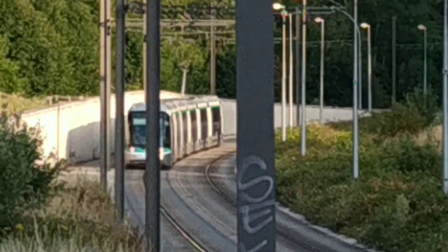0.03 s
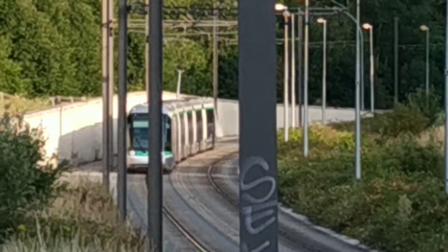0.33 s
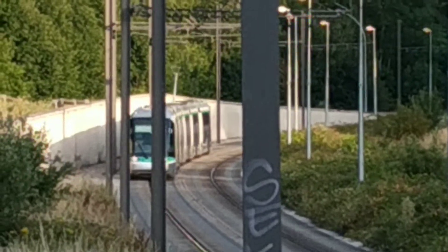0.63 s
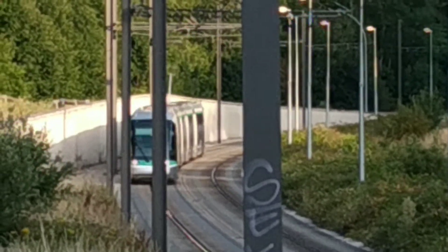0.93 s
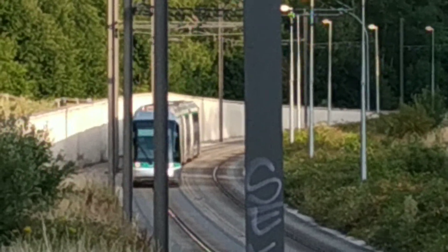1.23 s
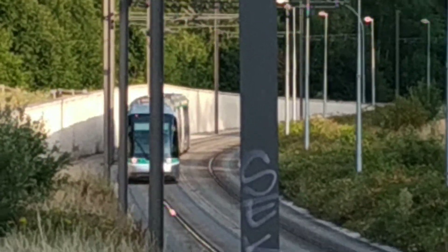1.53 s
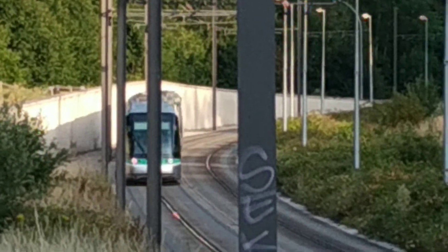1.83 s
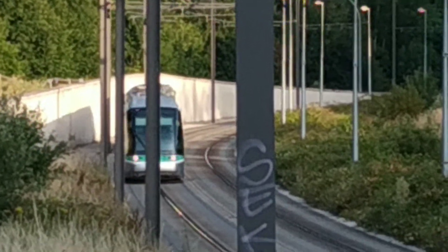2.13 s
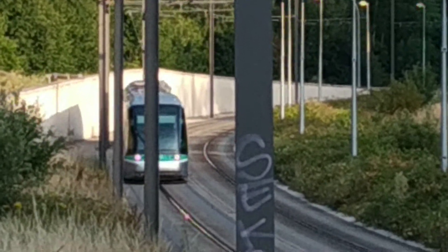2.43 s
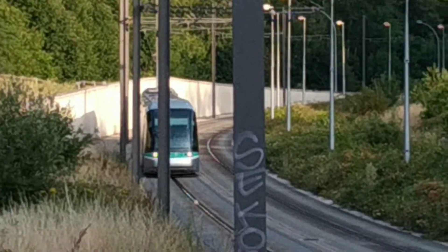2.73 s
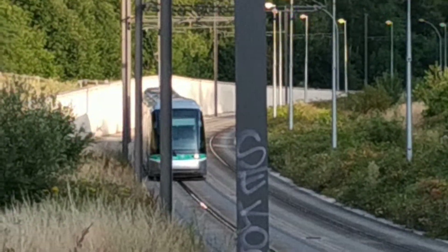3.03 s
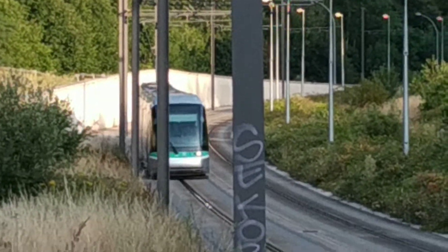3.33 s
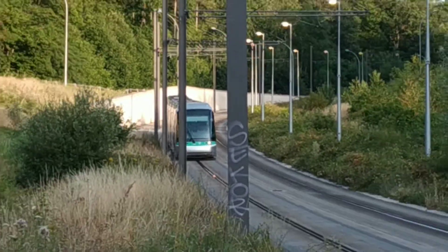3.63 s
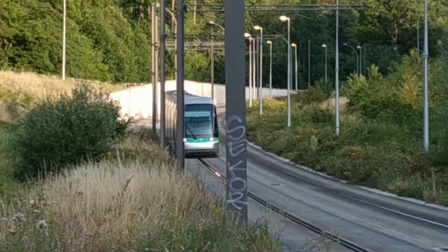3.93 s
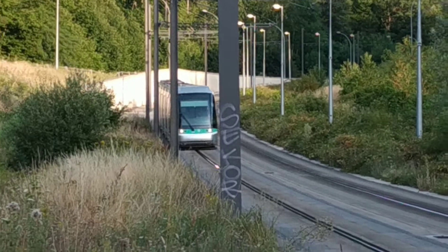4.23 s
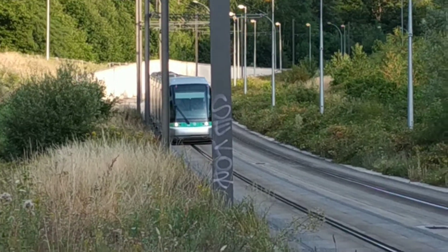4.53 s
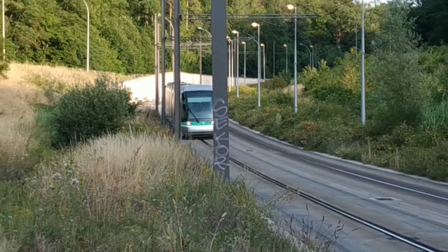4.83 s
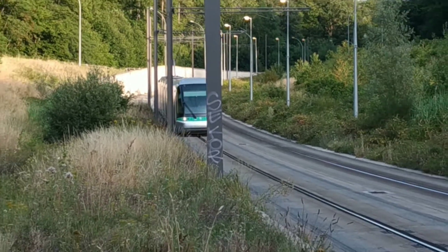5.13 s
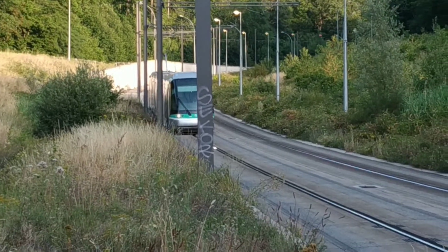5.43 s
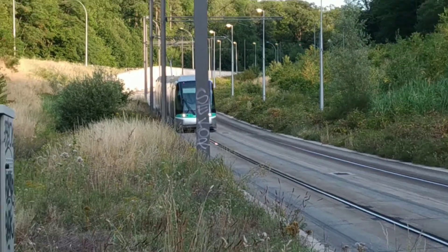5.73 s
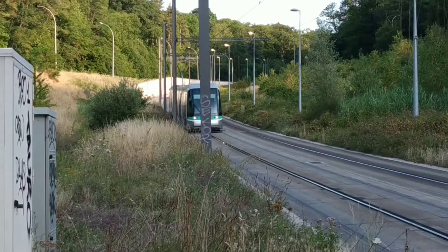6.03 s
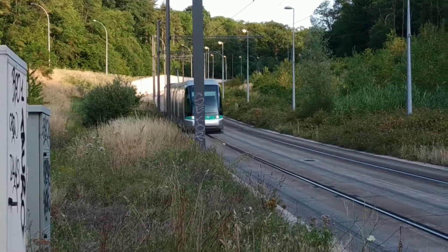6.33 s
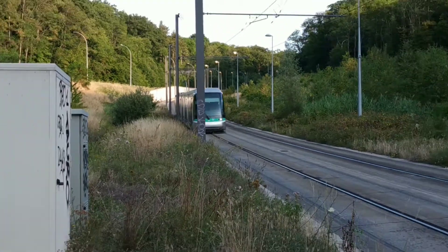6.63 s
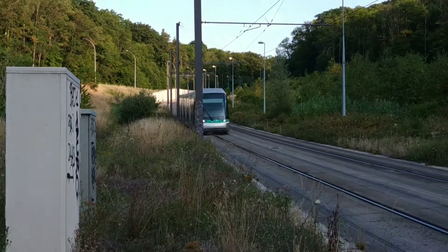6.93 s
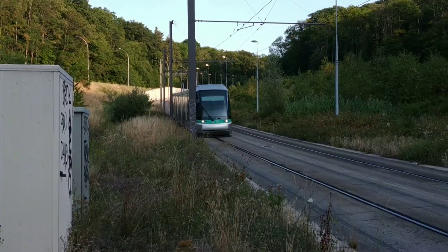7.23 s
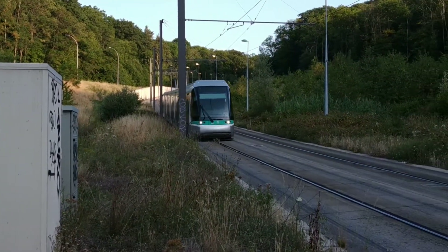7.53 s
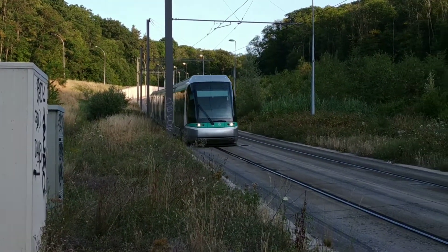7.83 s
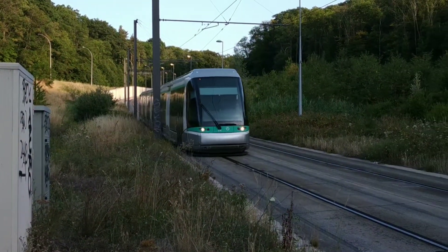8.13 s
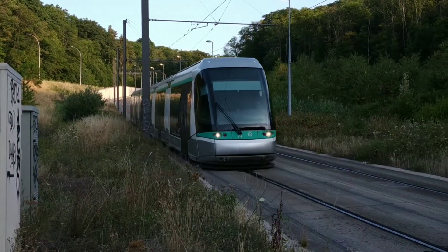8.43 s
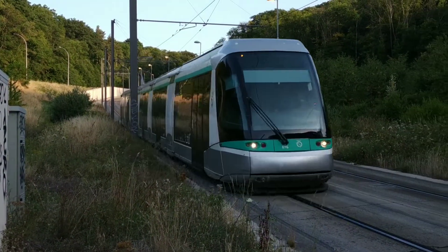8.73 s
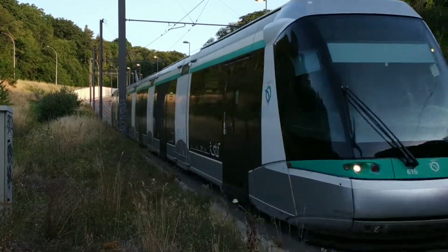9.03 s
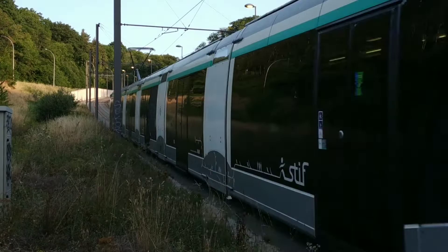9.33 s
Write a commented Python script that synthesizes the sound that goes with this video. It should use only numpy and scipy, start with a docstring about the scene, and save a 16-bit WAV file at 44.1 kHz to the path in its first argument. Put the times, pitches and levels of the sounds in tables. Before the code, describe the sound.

A rubber-tyred tram approaches from afar, rumbling and whining until it passes close, while a cricket rasps quick, high chirps.

```python
"""A rubber-tyred tram rolls out of a far curve while a bush cricket rasps double chirps in the verge,
dragging a scraper over the teeth of its wing. Tyres rumble and roar on concrete under the hum of motor
and fan. The tram gathers pace, then brakes gently; gear whine comes in spurts and the cricket pauses twice.
A second before the tram arrives the cricket falls silent. Hiss and inverter whistle open up,
and the tram's tones sag in pitch as it draws level, close by."""
import sys
import numpy as np
from scipy import signal
from scipy.fft import rfft, irfft, next_fast_len
from scipy.io import wavfile
from scipy.ndimage import uniform_filter1d, map_coordinates

SR = 44100
rng = np.random.default_rng(int(sys.argv[2]) if len(sys.argv) > 2 else 0)


def put_to_file(sound):
    """Save the sound as 16-bit audio at rate SR, in the file named by the first command-line argument."""
    columns = np.atleast_2d(sound).T  # one column per channel
    safe = np.clip(columns, -1, 1)
    whole_steps = np.round(safe * 32767)
    wavfile.write(sys.argv[1], SR, whole_steps.astype(np.int16))


N = 414540
TIME = np.arange(N) / SR
ABREAST_S, GAP_M = 9.4, 2.7  # when the tram draws level, and how far away

# The tram's pace: time_s, speed_m_per_s
TRAM_SPEED = [(0, 12), (3.4, 14), (8.3, 10), (9.4, 9.8)]
# Noise colours of body, underfloor, tyre roar, tread, hiss and fan air: pitch_hz, level_db
BODY_COLOUR = [(25, -49), (40, -40), (64, -29.5), (103, -22), (125, -15), (160, -8), (190, 0), (220, 6),
               (245, -0.5), (280, -2), (335, -16), (380, -11), (490, -30), (840, -80)]
UNDERFLOOR_COLOUR = [(25, -38), (60, -39), (110, -30), (135, -8), (165, -1), (200, 1.5), (235, -3),
                     (280, 5), (335, -5.5), (390, 3), (520, -14), (640, -9), (860, -10), (1100, -34)]
ROAR_COLOUR = [(200, -43), (320, -4.5), (430, -7), (560, -5), (680, 2), (800, 0.5), (920, -1), (1040, -9.5),
               (1400, -34), (2500, -80)]
TREAD_COLOUR = [(600, -40), (900, -4.5), (1050, -2.5), (1180, 2.5), (1400, 0), (1650, -1.5), (2000, -7.5),
                (2600, -17.5), (5000, -55)]
HISS_COLOUR = [(1200, -48), (1750, -0.5), (2100, 2.5), (2600, 1), (3000, 1.5), (3600, 2.5), (4300, -5),
               (5000, -16.5), (8000, -49)]
AIR_COLOUR = [(3000, -26), (4300, -3.5), (5000, 0.5), (5500, 1), (6150, -3), (6700, 2), (8200, 5.5),
              (9200, 7), (9900, 3), (11000, 0), (11900, 5), (12700, -5), (15500, -23)]
# Fader rides on the rolling noise, on top of its rise with nearness: time_s, level_db
BASS_RIDE = [(0, -1.5), (1.1, -0.5), (2.9, 1.5), (3.5, -1.5), (4.1, 1), (6.6, -0.5), (8, 1), (9, 1)]
MIDDLE_RIDE = [(0, 0), (1.5, 1), (2.7, 0.7), (4, -.3), (5, -0.2), (6.8, -.5), (7.6, 0.4), (8.3, -0.5),
               (9.4, 0)]
TREBLE_RIDE = [(0, -3), (1.8, 2.5), (2.6, -2.5), (3.8, -1), (4.5, -3), (5.8, -0.5), (6.75, 0), (7.1, 3.5),
               (7.7, 0.2), (8.3, 0), (8.75, 2), (9.4, 1)]
# Moving notches in the rolling noise (negative depth lifts): time_s, pitch_hz, depth_db
GROUND_NOTCH = [(0, 1370, 6), (1, 1570, 8.5), (3, 1720, 5), (4.5, 1910, 8), (6.3, 2930, 3.5),
                (8.5, 3350, 1.5), (8.95, 3220, 8), (9.4, 2080, -5)]  # the ground bounce cancels one band
MID_HISS_NOTCH = [(7.8, 6300, -1), (8.45, 6300, 4), (8.85, 5600, 5), (9.4, 5200, 7)]
TOP_HISS_NOTCH = [(8.2, 10200, -2), (8.8, 10600, -1), (9.15, 11000, 6), (9.4, 10100, 18)]
# How alike the tram sounds in both ears: pitch_hz, likeness_ratio
TRAM_LIKENESS = [(60, 0.53), (130, 1), (300, 0.92), (640, 0.91), (1400, 1), (2500, 0.73), (4000, 0.13),
                 (15000, 0.13)]
# The tram's stereo balance: pitch_hz, left_minus_right_db
TRAM_PAN = [(60, -1), (200, -2.5), (700, -2), (1300, -1.5), (1600, -4.5), (2400, -1.5), (3300, 1.5),
            (4200, 10), (5200, 14), (7000, 7.5), (10500, 2.5), (12000, 11), (14000, 28)]
# Swells of motor hum, roof fan and gear mesh: time_s, level_db
MOTOR_RIDE = [(0.0, -47), (0.17, -42.5), (0.51, -40), (1.33, -56), (2.81, -55), (2.97, -40.5), (3.2, -53),
              (3.28, -40), (4.03, -44), (4.7, -55), (4.95, -42), (5.9, -37.5), (6.23, -45.5), (7.0, -43),
              (7.2, -50), (8.27, -27), (8.67, -30), (8.9, -23.5), (9.09, -19), (9.3, -21.5), (9.4, -31)]
FAN_RIDE = [(0.0, -49.5), (3.48, -52.5), (4.75, -49), (5.2, -45.5), (5.7, -43.5), (6.05, -39), (6.4, -42.5),
            (6.72, -41), (7.1, -47), (7.6, -38), (8.04, -39.5), (8.3, -44), (8.6, -40), (9.0, -44)]
MESH_RIDE = [(0, -61), (5.1, -59), (5.55, -53), (5.72, -48.5), (6.35, -47.5), (6.6, -41.5), (6.8, -42),
             (7.0, -43.5), (7.2, -39), (7.45, -41), (7.9, -45), (8.25, -40.5), (9.4, -44)]
# Machine tones as heard head-on at 9.8 m/s: pitch_hz, level_db
FAN_TONES = [(501.3, 1.5), (454.4, -6), (218.6, -11.5), (166, -8)]
GEAR_TONES = [(1156, -5), (2048, -10.5), (2880, -7.5), (3099, -11), (3316, -10), (3489, -12), (3596, -18)]
COIL_TONES = [(4492, -0.5), (4637, -12), (4938, -6.5), (5657, -10), (5835, -9.5), (7640, -7.5)]
INVERTER_TONES = [(3610, -5), (4490, -5.5), (5822, -12), (6700, -10.5), (7171, -10), (7610, -2),
                  (8075, -11), (8500, 1)]

# Runs of evenly spaced chirps: first_s, last_s, level_db
CHIRP_RUNS = [(.0068, 2.5448, -3), (2.627, 3.0275, -2.5), (3.1051, 5.6295, -3.5), (5.708, 6.348, -3.5),
              (6.664, 7.453, -4), (7.964, 8.36, -6.5)]
# The chirps drag and hurry: time_s, late_ms
CHIRP_DRAG = [(0, -1), (.8, 2), (2.0, -2), (2.8, 0.5), (3.1, -2.5), (3.42, 0), (3.97, -1), (4.2, 1.5),
              (4.9, 3), (5.25, -2.5), (6.35, 0.5)]
# A chirp's two wing strokes: peak_s, bite_before_peak_s, swell_s, fade_s, tooth_rate_hz, level_db
WING_STROKES = [(-.0012, .0088, 0.0049, 0.0015, 800, -5.5), (0.0211, .0125, 0.008, 0.0066, 800, -8.5)]
# The scraper jumps coarse teeth at the height of the second stroke: into_chirp_s, level_db
COARSE_TEETH = [(0.021, -6.5), (0.0224, -4.5), (.0251, -2.5), (.0283, -5), (.0325, -12)]
# Colours of the cricket's song: pitch_hz, level_db
WING_COLOUR = [(6500, -43.5), (7800, -34), (8450, -18), (8900, -8), (9400, -2.5), (9850, -4), (10250, 0),
               (10700, -1.5), (11250, -6), (11620, -12.5), (12000, -8.5), (12600, -13.5), (13100, -21),
               (14100, -20), (15000, -24.5), (15600, -29)]  # the ringing membrane
COARSE_COLOUR = [(9500, -0.5), (11000, 1), (12200, -6), (13500, -12)]  # coarse teeth sound duller than fine ones
SIZZLE_COLOUR = [(8000, 2.5), (11500, -1), (12500, 2), (13500, 5.5), (15500, 5)]  # a bright, high sizzle lingers between the chirps
# Stereo balance of the close song and of its echo from the verge: pitch_hz, left_minus_right_db
WING_PAN = [(8400, 10), (9300, 5.5), (10200, 4), (10800, 1), (12200, -2.5), (15000, -1)]
VERGE_PAN = [(8400, 10), (10200, 6.5), (11200, 3.5), (12500, 0.5)]


def rolling():
    """The body booms, tyres roar on concrete; hiss and fan air open up, and the front wheel sweeps by."""
    body = nearing(-24, lead_m=2.3, reach_m=2.8, fall_db=4, far_db=-44.5) * rush(BODY_COLOUR, -1)
    underfloor = nearing(-20.5, lead_m=.2, reach_m=2.25, fall_db=6) * rush(UNDERFLOOR_COLOUR, .5)
    roar = nearing(-21, lead_m=3, reach_m=7.6, fall_db=6.5, far_db=-43) * rush(ROAR_COLOUR, 1.5)
    tread = nearing(-22, lead_m=5.8, reach_m=4.63, fall_db=4.5, far_db=-41) * rush(TREAD_COLOUR, 1.5)
    hiss = nearing(-29, lead_m=5.6, reach_m=17.1, fall_db=12, far_db=-49) * rush(HISS_COLOUR, 1.5)
    front_wheel = nearing(-26, lead_m=.1, reach_m=1.45, fall_db=14.5) * rush(HISS_COLOUR, 4.5)
    air = nearing(-29.5, lead_m=3.4, reach_m=9.4, fall_db=8, far_db=-65) * rush(AIR_COLOUR, 3)
    bass = ride(BASS_RIDE) * body
    middle = ride(MIDDLE_RIDE) * (roar + tread)
    treble = ride(TREBLE_RIDE) * (hiss + air)
    return bass + underfloor + middle + treble + front_wheel


def rush(colour, patchy_db):
    """Coloured stereo noise from the tram, with drifting patches and three moving notches."""
    hz, t, (mid, side) = signal.stft(rng.standard_normal((2, N)), SR, nperseg=1024)
    hz = hz[:, None]
    patches = uniform_filter1d(rng.standard_normal(mid.shape), 7, axis=0)
    patches = unit(uniform_filter1d(patches, 12, axis=1))
    cut_db = 0
    for notch, width in (GROUND_NOTCH, .19), (MID_HISS_NOTCH, .066), (TOP_HISS_NOTCH, .065):
        notch_hz, depth_db = curves(notch, t)
        cut_db += depth_db * np.exp(-(np.log((hz + 1) / notch_hz) / width) ** 2)
    alike = np.clip(along(TRAM_LIKENESS, hz), 0, .999)
    side = side * np.sqrt((1 - alike) / (1 + alike))
    lag_ms, pan_db = bearing(t)
    lead = amp(pan_db / 2) * np.exp(1j * np.pi * hz * lag_ms / 1000)
    pair = np.array([(mid + side) * lead, (mid - side) / lead]) * ears(TRAM_PAN, hz)
    noise = signal.istft(pair * amp(patchy_db * patches - cut_db), nperseg=1024)[1][:, :N]
    noise = filtered(noise, lambda hz: amp(along(colour, hz)))
    return noise / np.std(noise.mean(0))


def motor_and_fan():
    """The motor and the roof fan hum, swelling and fading along the way."""
    motor = ride(MOTOR_RIDE) * tones([(402.3, .4)], scatter=.21, flutter_hz=16, behind_m=-.93)
    fan = ride(FAN_RIDE) * tones(FAN_TONES, scatter=.33, flutter_hz=7.6)
    return motor + fan


def gears(surges_per_m=.8, surge_db=2, mesh_flicker_db=.7, whine_flicker_db=1.5):
    """The gears whine, and one mesh tone surges in step with the distance rolled."""
    whine = nearing(-40, lead_m=7.8, reach_m=12, fall_db=6, far_db=-50.5)
    whine = whine * tones(GEAR_TONES, scatter=.9, flutter_hz=19)
    surge = np.sin(2 * np.pi * surges_per_m * travel()[1])
    mesh_gain = ride(MESH_RIDE) * amp(surge_db * surge + mesh_flicker_db * wobble(18))
    mesh = mesh_gain * tones([(2648, 0)], scatter=.6, flutter_hz=60)
    return whine * amp(whine_flicker_db * wobble(4.4)) + mesh


def electrics():
    """Coils sing, and the inverter adds whining sidebands and a thin whistle."""
    coils = nearing(-46.5, lead_m=18, reach_m=13.6, fall_db=16, far_db=-66.5)
    coils = coils * tones(COIL_TONES, scatter=1.6, flutter_hz=50)
    sidebands = nearing(-33.5, lead_m=3.7, reach_m=6.5, fall_db=12, far_db=-71)
    sidebands = sidebands * tones(INVERTER_TONES, scatter=2.1, flutter_hz=80, behind_m=.3)
    whistle = nearing(-33, lead_m=2.8, reach_m=10.6, fall_db=14.5)
    whistle = whistle * tones([(12000, 0)], scatter=.9, flutter_hz=80, behind_m=.3)
    return coils + sidebands + whistle


def tones(lines, scatter, flutter_hz, behind_m=0):
    """Doppler-shifted tones of a machine behind_m back from the nose; scattered paths make them flutter."""
    warped_s = np.cumsum(doppler(behind_m)) / SR
    out = np.zeros((2, N))
    for hz, db in lines:
        shared, apart = (wobble(flutter_hz) + 1j * wobble(flutter_hz) for _ in range(2))
        spread = np.sqrt(np.clip(1 - along(TRAM_LIKENESS, hz), 0, 1))
        paths = 1 + scatter * (shared + spread * np.array([apart, -apart]))
        tone = np.real(paths * np.exp(2j * np.pi * hz * warped_s))
        out += amp(db) * ears(TRAM_PAN, hz)[:, None] * tone / np.std(tone.mean(0))
    return out


def travel(t=TIME):
    """The tram's speed (m/s) and the track still to go (m) until it draws level."""
    speed = curves(TRAM_SPEED)[0]
    gone = np.cumsum(speed) / SR
    return np.interp(t, TIME, speed), np.interp(ABREAST_S, TIME, gone) - np.interp(t, TIME, gone)


def nearing(peak_db, lead_m, reach_m, fall_db, far_db=None):
    """Gain that peaks lead_m before the tram draws level, fall_db less per doubling beyond reach_m."""
    doublings = np.log2(np.hypot(1, (travel()[1] - lead_m) / reach_m))
    waver_db = .5 * wobble(6)  # moving air
    direct = amp(peak_db - fall_db * doublings + waver_db)
    return direct if far_db is None else np.hypot(direct, amp(far_db))  # over a steady far wash


def doppler(behind_m, sound_m_per_s=343, listed_m_per_s=9.8):
    """Pitch ratio from the part of the speed that points at the listener."""
    speed, to_go = travel()
    away = to_go + behind_m
    closing_speed = speed * away / np.hypot(away, GAP_M)
    return (sound_m_per_s - listed_m_per_s) / (sound_m_per_s - closing_speed)


def bearing(t, ahead_lag_ms=.048, abreast_lag_ms=.24, ahead_pan_db=2.5):
    """Right-ear lag (ms) and leftward pan (dB) as the tram swings from ahead to alongside."""
    swing = GAP_M ** 2 / (GAP_M ** 2 + travel(t)[1] ** 2)
    return ahead_lag_ms + (abreast_lag_ms - ahead_lag_ms) * swing, ahead_pan_db * (1 - swing)


def cricket(stop_db=-7, stems_db=-10, verge_db=-7, split_hz=9570, left_lag_s=.00056):
    """Tooth strikes ring the wing's low and high modes; stems and the verge scatter the song."""
    chirps = chirp_times()
    ring = irfft(causal(amp(along(WING_COLOUR, np.fft.rfftfreq(1024, 1 / SR)))))
    high = lambda hz: .5 + .5 * np.tanh((hz - split_hz) / 600)
    strikes = fine_teeth(chirps) + coarse_teeth(chirps)
    strikes = filtered(strikes, lambda hz: np.array([1 - high(hz), high(hz)])).sum(0)
    rasp = signal.fftconvolve(strikes, ring)[:N]
    song = unit(rasp) + amp(stop_db) * unit(wing_stop(chirps))
    direct = filtered(song, lambda hz: np.exp(-2j * np.pi * np.outer([left_lag_s, 0], hz)))
    stems = amp(stems_db) * scattered(song, t60_s=.035)
    close = filtered(direct + stems, lambda hz: ears(WING_PAN, hz))
    verge = scattered(song, t60_s=.23)
    sizzle = filtered(verge, lambda hz: amp(along(SIZZLE_COLOUR, hz)) * ears(VERGE_PAN, hz))
    return amp(-30) * unit(close + amp(verge_db) * sizzle)


def chirp_times(period_s=.0793):
    """The cricket's loose beat, one row a chirp: time_s, level_db."""
    rows = []
    for first, last, db in CHIRP_RUNS:
        count = round((last - first) / period_s) + 1
        rows += [(s, db) for s in np.linspace(first, last, count)]
    s, db = np.transpose(rows)
    return np.column_stack([s + curves(CHIRP_DRAG, s)[0] / 1000, db])


def fine_teeth(chirps, count=25):
    """Each stroke bites at once and drags the scraper over uneven teeth, swelling and breaking off."""
    strikes = np.zeros((2, N))
    for peak_s, bite_s, swell_s, fade_s, rate_hz, stroke_db in WING_STROKES:
        teeth = np.arange(count) + rng.normal(0, .3, (len(chirps), count))
        pace, force = rng.standard_normal((2, len(chirps), 1))  # no two strokes are alike
        from_peak_s = teeth / rate_hz - bite_s
        envelope = np.exp(-.5 * (from_peak_s / np.where(from_peak_s < 0, swell_s, fade_s)) ** 2)
        tooth_db = chirps[:, 1:] + stroke_db + .71 * force + 1.3 * rng.standard_normal(teeth.shape)
        tooth_s = chirps[:, :1] + peak_s + from_peak_s * np.exp(.12 * pace)
        strikes += strike(tooth_s, envelope * amp(tooth_db))
    return strikes


def coarse_teeth(chirps, slip_s=.0007, jitter_s=.0002, scatter_db=1.8):
    """The coarse teeth give a few separate hard clicks, never quite in the same place."""
    s, db = np.transpose(COARSE_TEETH)
    jitter, force = rng.standard_normal((2, len(chirps), len(s)))
    slip = rng.standard_normal((len(chirps), 1))
    click_s = chirps[:, :1] + s + slip_s * slip + jitter_s * jitter
    clicks = strike(click_s, amp(chirps[:, 1:] + db + scatter_db * force))
    return filtered(clicks, lambda hz: amp(along(COARSE_COLOUR, hz)))


def strike(s, size, lean_db=2.5):
    """Clicks shared unevenly between the wing's low and high modes."""
    lean = lean_db * rng.standard_normal(s.shape)
    return np.array([impulses(s, size * amp(-lean)), impulses(s, size * amp(lean))])


def wing_stop(chirps, start_hz=10400, end_hz=8700, early_s=.0006, length_s=.0035):
    """As the first stroke brakes, the teeth merge into a short falling tone."""
    progress = np.linspace(0, 1, int(length_s * SR))
    pitch, force = rng.standard_normal((2, len(chirps), 1))
    hz = (start_hz + (end_hz - start_hz) * progress) * (1 + .018 * pitch)
    envelope = amp(chirps[:, 1:] + 1.1 * force) * np.sin(np.pi * np.sqrt(progress))
    squeak = envelope * np.sin(2 * np.pi * np.cumsum(hz, axis=1) / SR)
    samples = np.round((chirps[:, :1] - early_s) * SR) + np.arange(len(progress))
    return impulses(samples / SR, squeak)


def scattered(x, t60_s):
    """A diffuse stereo tail of about the same energy as x."""
    t = TIME[:SR // 4]
    tail = rng.standard_normal((2, len(t))) * amp(-60 * t / t60_s)
    return signal.fftconvolve(x[None], tail / np.linalg.norm(tail[0]), axes=1)[:, :N]


def amp(db):
    """Decibels to gain."""
    return 10 ** (np.asarray(db) / 20)


def unit(x):
    """Scale to rms 1."""
    return x / np.sqrt(np.mean(x ** 2) + 1e-20)


def along(points, hz):
    """Read (pitch_hz, value) points on a log axis."""
    pitches, values = np.transpose(points)
    return np.interp(np.log(hz + 1), np.log(pitches + 1), values)


def curves(rows, t=TIME):
    """Each column after the time, read at the times t."""
    s, *columns = np.transpose(rows)
    return [np.interp(t, s, column) for column in columns]


def ride(rows):
    """A fader move: gain from (time_s, level_db) points."""
    return amp(curves(rows)[0])


def wobble(rate_hz):
    """A smooth random curve with rate_hz knots a second."""
    coarse = TIME[::32]
    knots = rng.standard_normal(int(N * rate_hz / SR) + 4)
    return np.interp(TIME, coarse, map_coordinates(knots, [coarse * rate_hz]))


def filtered(x, response):
    """Multiply the spectrum of x by a function of frequency."""
    size = next_fast_len(N + SR // 2)
    return irfft(rfft(x, size) * response(np.fft.rfftfreq(size, 1 / SR)), size)[..., :N]


def causal(gain):
    """The minimum-phase response with this gain: it rings only after the blow."""
    cepstrum = irfft(np.log(np.maximum(gain, 1e-6)))
    half = len(cepstrum) // 2
    cepstrum[1:half] *= 2
    cepstrum[half + 1:] = 0
    return np.exp(rfft(cepstrum))


def ears(pan, hz):
    """Left and right gains whose mean is 1."""
    gains = amp(np.multiply.outer([.5, -.5], along(pan, hz)))
    return gains / gains.mean(0)


def impulses(s, size):
    """Clicks of the given sizes at the given times."""
    at = np.round(s * SR).astype(int)
    heard = (at >= 0) & (at < N)
    return np.bincount(at[heard], size[heard], N)


def scene():
    """Tram and cricket together."""
    return rolling() + motor_and_fan() + gears() + electrics() + cricket()


def record(dry, self_noise_db=-60, top_hz=15550):
    """The microphones add a faint hiss of their own; everything above top_hz is cut."""
    return filtered(dry + amp(self_noise_db) * rng.standard_normal(dry.shape), lambda hz: hz < top_hz)


dry = scene()
out = record(dry)
put_to_file(out)
```